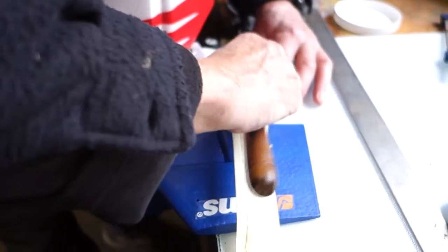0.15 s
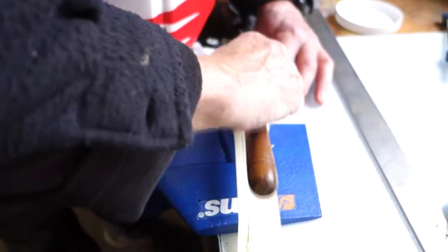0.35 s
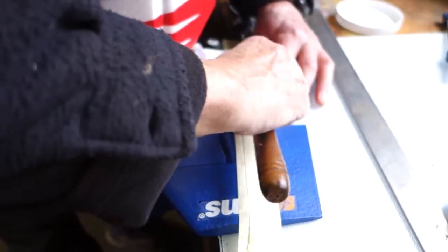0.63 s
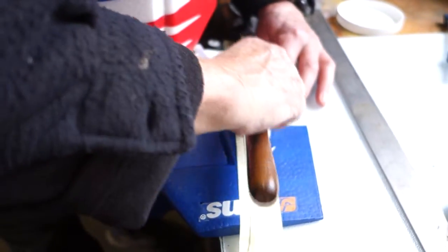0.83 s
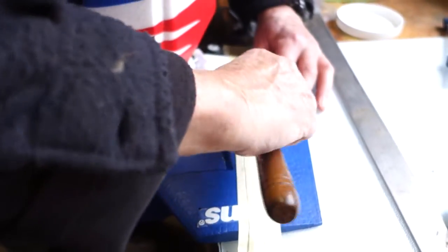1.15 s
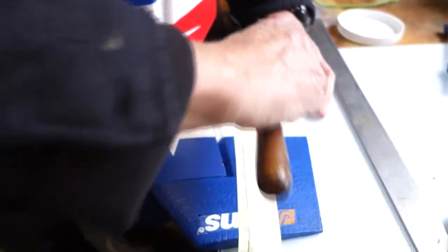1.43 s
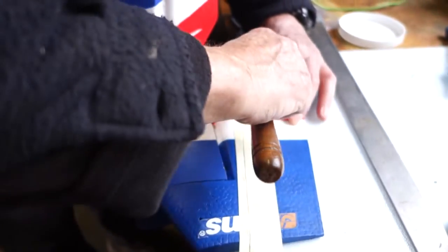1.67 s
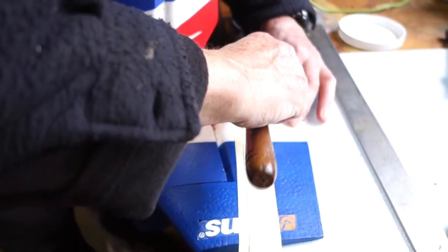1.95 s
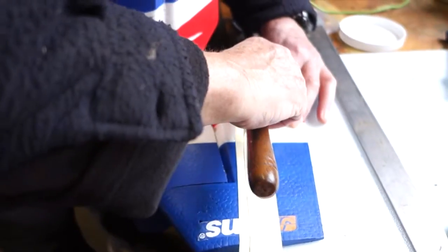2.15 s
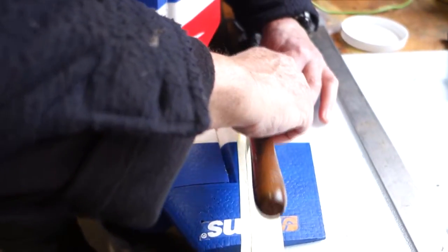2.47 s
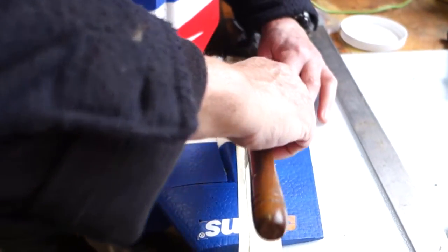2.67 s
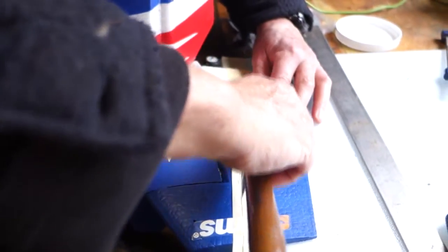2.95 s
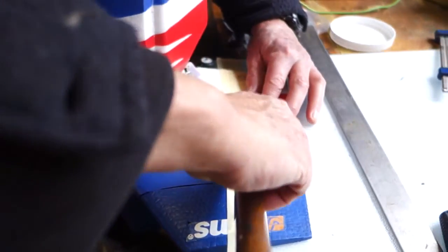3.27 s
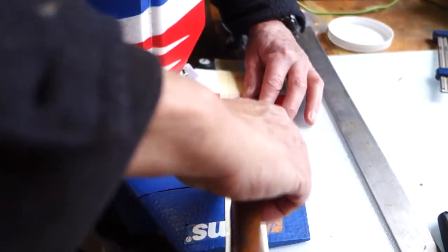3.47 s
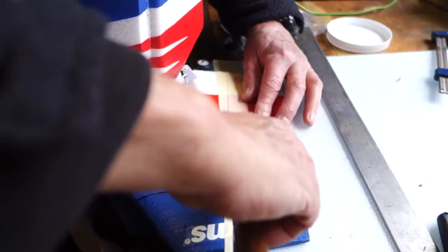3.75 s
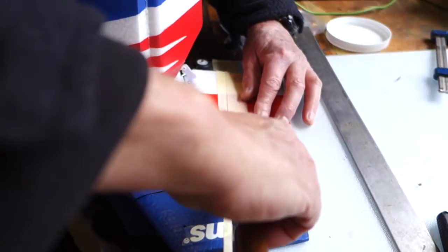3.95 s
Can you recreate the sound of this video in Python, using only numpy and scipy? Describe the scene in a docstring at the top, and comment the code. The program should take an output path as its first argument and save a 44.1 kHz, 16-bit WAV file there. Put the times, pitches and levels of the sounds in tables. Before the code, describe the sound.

A small fine-toothed razor saw cuts a groove in foam board, close to the microphone and slightly to the right, in a small workshop. From the start until about 1.5 seconds it makes quick, uneven back-and-forth strokes, each a dry, scratchy rasp, with small snaps as the teeth catch. The blade gives one brief high squeak at about 1.3 seconds. The sawing then thins to a few faint scrapes, ticks and tiny hollow creaks. At about 2.3 seconds a long rasping draw begins with a cluster of little cracks and fades around 3.3 seconds. Four more short strokes follow between 3.4 and 3.9 seconds. Hard pushes make the bench rumble softly near 0.5 and 1 second and again after 3 seconds. A motor, probably a fan, hums low throughout over soft room noise.

```python
"""A small workshop, stereo microphone close to a fine-toothed razor saw working a groove in foam board.
The teeth burst foam cells in a dry rasp that rings through board, blade and bench. They snag with small
snaps, the bench rumbles under hard pushes, the board creaks and the binding blade squeaks once.
Short strokes thin out, then come one long draw and a few more short ones.
Behind it a motor, probably a fan, hums low throughout over soft room noise."""
import sys
import numpy as np
from scipy import signal
from scipy.fft import rfft, irfft, next_fast_len
from scipy.io import wavfile
from scipy.ndimage import uniform_filter1d, map_coordinates

SR = 44100
rng = np.random.default_rng(int(sys.argv[2]) if len(sys.argv) > 2 else 0)


def generate_wav(signal):
    """Clip the signal to [-1, 1] and save it as 16-bit WAV at the path in sys.argv[1]."""
    frames = np.transpose(np.atleast_2d(signal))
    scaled = np.clip(frames, -1, 1) * 32767
    pcm = np.round(scaled).astype(np.int16)
    wavfile.write(sys.argv[1], SR, pcm)


N = 181017

# Levels in the tables are relative; spectra give level per unit of bandwidth.
# drift of the five-bladed fan: t/s, blade rate/Hz, level/dB
FAN_DRIFT = [(0.0, 96.3, -54), (.5, 95.5, -50.5), (1.28, 96, -46), (1.37, 93.5, -48), (1.75, 94.43, -48.5),
             (1.93, 92.9, -43), (2.72, 93.56, -45), (3.52, 94.1, -45), (4.1, 95.4, -49)]
# lines of the hum: multiple of the shaft rate, level/dB
FAN_ORDERS = [(2, -32), (4, -18), (5, 0.5), (6, -8), (7, -18.5), (8, -17), (10, -24), (11, -25.5),
              (12, -27), (14, -24)]
# the fan's ninth order swells and fades: t/s, level/dB
FAN_NINTH = [(0.0, -47), (1.55, -53.5), (2.5, -52), (3.7, -51), (4.1, -65)]
# spectrum of the still room: f/Hz, level/dB
AIR_SPECTRUM = [(25, -23.5), (64, -6.5), (96, -8.5), (135, -10.5), (175, -10), (260, -15.5), (330, -19.5),
                (450, -24.5), (700, -37.5), (1900, -31), (2700, -38), (3100, -42), (10000, -46.5),
                (15500, -59)]
# short strokes: top speed t/s, rise/s, fall/s, rasp/dB, then re the rasp: board/dB, fizz/dB, bench/dB
SHORT_STROKES = [ (0.0, .02, 0.078, -33.5, -2.5, -13, -9.5), (0.15, 0.097, 0.12, -31, -5, -6, -18.5),
                 (0.259, 0.042, 0.11, -39, -5.5, -4, -12.5), (0.417, 0.043, 0.08, -60, -11, -1, -12),
                 (0.524, 0.06, 0.064, -28.5, -3.5, -4.5, -13), (0.605, 0.032, .04, -39, -7, -5, -13),
                 (0.7, 0.096, 0.055, -33.5, -1.5, -1.5, -11.5),
                 (0.835, 0.034, 0.046, -44.5, 3.5, 3.5, -4.5), (1.041, 0.15, .14, -31, 2, -0.5, -9),
                 (1.231, 0.074, 0.092, -39.5, -5, -2.5, -11), (1.355, 0.1, 0.076, -33, -5, -4, -18),
                 (1.44, .04, 0.36, -60, 1, -10, 5), (1.878, 0.0072, 0.024, -62.5, 2, -1, -18),
                 (2.013, .013, 0.02, -54, -2, -2, -20), (2.105, 0.046, 0.048, -63, 2, -3, -20),
                 (2.228, 0.042, 0.066, -50.5, 2, 5.5, -15), (2.3, 0.014, 0.016, -50.5, 1.5, 10.5, -2),
                 (3.396, 0.04, 0.062, -35, -7, -12, -8), (3.506, 0.048, 0.078, -39, -9.5, -8, -13),
                 (3.618, 0.078, 0.12, -33.5, -2, -11.5, -8.5), (3.841, 0.069, 0.1, -36, -3, -9, -9.5)]
# long draw ending in a light drag: t/s, rasp/dB, then re the rasp: board/dB, fizz/dB, bench/dB
LONG_DRAW = [(2.31, -54.5, -6, 0, -3), (2.345, -47.5, -5.5, 6, -6), (2.41, -40.5, -2, -3, -12),
             (2.49, -43.5, 1.5, 1.5, -19), (2.57, -35.5, -2.5, -0.5, -19), (2.65, -38.5, -1, -6, -12.5),
             (2.9, -39, -2, -3.5, -9), (3.17, -41, -2, -1.5, -6), (3.29, -51, 2.5, -3.5, -13),
             (3.8, -48, -2, -8.5, 3.5), (4.1, -70.5, 3, 0, 1.5)]
# spectra of tearing foam, its body and its fizz: f/Hz, level/dB
RASP_SPECTRUM = [(200, -39), (600, -37), (1000, -8.5), (1500, -2.5), (2400, 1), (3300, 2), (4400, 1),
                 (5500, 1.5), (6900, 1), (8000, -12.5), (11000, -7.5), (16000, -10)]
FIZZ_SPECTRUM = [(2000, -30), (4500, -21.5), (6900, -0.5), (7800, 2.5), (9800, 2.5), (12000, -3),
                 (14000, -8.5), (16000, -24)]
# resonances of foam board, blade and bench: f/Hz, width/Hz, level/dB
BOARD_MODES = [(779, 63, 5), (885, 163, 5.5), (1167, 190, -1), (1270, 80, 8.5), (1413, 590, -2.5),
               (1706, 130, 9.5), (2277, 390, -1), (2770, 135, 6.5), (3080, 56, -1.5), (3420, 30, -44)]
BLADE_MODES = [(3950, 1130, -3), (4158, 150, 17), (4210, 560, 8.5), (5050, 64, 12), (5350, 420, -8),
               (6070, 44, 7)]
BENCH_MODES = [(58.6, 15, -10.5), (122, 49, -4), (244, 18.7, -4), (280.8, 15.6, 1.5), (372, 25, -4.5),
               (403, 69, -8.5), (531, 70, -14.5), (621, 31, -17.5), (965, 100, -6)]
# the blade rings most when deep in the groove: t/s, level/dB re the rasp
BLADE_RINGING = [(0, -3), (.35, -19), (1.1, -6), (1.45, -24), (2.9, -13), (3.15, -1.5), (4.1, -7)]
# teeth that snag and let go: t/s, crack/dB, tap/dB re the crack
TOOTH_SNAGS = [(0.001, -10, -8), (0.6015, -23, -23), (0.607, -18.5, -21), (0.8122, -27, -16),
               (0.917, -32, -16), (1.2127, -18, -30), (1.228, -22, -12.5), (1.3058, -25, -22),
               (1.39, -21, -25), (1.871, -47, -8), (2.1425, -41, -15), (2.2066, -35, -22),
               (2.3279, -26, -31), (2.414, -21, -30), (2.4211, -16, -30), (2.4245, -18, -32),
               (2.429, -22, -24), (2.4448, -15.5, -24), (2.6691, -31, 1), (2.777, -35, 3),
               (2.9963, -21, -16), (3.3975, -23, -9), (3.562, -26, -13), (3.7897, -33, -9),
               (3.8402, -28, -9)]
# the hand's pushes jolt the bench: peak t/s, level/dB, half-length/s
BENCH_JOLTS = [(0.557, -44, 0.042), (1.047, -43.5, 0.03), (2.585, -53.5, 0.0047), (2.81, -61, 0.023),
               (3.216, -41.5, 0.032), (3.442, -46.5, 0.056), (3.7, -44.5, 0.043), (3.887, -42.5, 0.029)]
# short hollow creaks of the board: peak t/s, f/Hz, level/dB, half-length/s
BOARD_CREAKS = [(1.24, 910, -48, 0.014), (1.885, 1290, -60, 0.0096), (2.016, 1269, -52, 0.0085),
                (2.897, 800, -53.5, 0.033)]
# stereo image of the saw at the microphone: f/Hz, left-right likeness (1 is mono)
SAW_LIKENESS = [(250, 0.98), (600, 0.87), (1300, 0.87), (2200, 0.58), (4000, 0.55), (8000, 0.29),
                (15000, 0.17)]
# balance of the work at the microphone: f/Hz, left minus right/dB
WORK_BALANCE = [(500, -0.5), (1200, 0), (2000, 0), (3300, -6), (5500, -2.5), (9000, -4.5), (12000, -1),
                (15000, -0.5)]
# reverberation of the workshop: f/Hz, T60/s
WALL_DECAY = [(200, 1), (2000, 0.85), (6000, 0.36), (14000, 0.37)]


def amp(db):
    """Decibels to gain."""
    return 10 ** (np.asarray(db) / 20)


def unit(x):
    """Scaled to rms 1."""
    return x / np.sqrt(np.mean(x ** 2) + 1e-20)


def along(points, hz):
    """Interpolates (f/Hz, value) points on a log axis."""
    f, values = np.transpose(points)
    return np.interp(np.log(hz + 1), np.log(f + 1), values)


def curves(rows):
    """One value per sample for each column after the time."""
    times, *columns = np.transpose(rows)
    return [np.interp(np.arange(N) / SR, times, column) for column in columns]


def wobble(rate):
    """A smooth random curve, rate knots a second."""
    knots = rng.standard_normal(int(N * rate / SR) + 4)
    return map_coordinates(knots, [np.arange(N) * rate / SR])


def swell(peak_s, half_s):
    """A bell-shaped rise and fall."""
    return np.exp(-((np.arange(N) / SR - peak_s) / half_s) ** 2)


def filtered(x, response):
    """x times a complex response of frequency."""
    size = next_fast_len(N + SR // 2)
    return irfft(rfft(x, size) * response(np.fft.rfftfreq(size, 1 / SR)), size)[..., :N]


def coloured(x, spectrum):
    """x shaped by a (f/Hz, level/dB) spectrum, at rms 1."""
    return unit(filtered(x, lambda hz: amp(along(spectrum, hz))))


def ringing(x, modes):
    """x through (f/Hz, width/Hz, level/dB) resonances of alternating sign, at rms 1."""
    def response(f):
        return sum((-1) ** k * amp(db) * 1j * f * width / (hz * hz - f * f + 1j * f * width)
                   for k, (hz, width, db) in enumerate(modes))
    return unit(filtered(x, response))


def spread(pair, likeness):
    """Two unrelated signals become left and right with the given (f/Hz, likeness)."""
    turn = lambda hz: np.arccos(np.clip(along(likeness, hz), -1, 1)) / 2
    mid, side = filtered(pair, lambda hz: np.array([np.cos(turn(hz)), np.sin(turn(hz))]))
    return np.array([mid + side, mid - side])


def fan(blades=5, mains_hz=51.5):
    """Orders of one drifting shaft beat against each other; the mains add a low line of steady pitch."""
    def line(phase):
        return np.sqrt(2) * np.sin(phase + 2 * np.pi * rng.random()) * amp(0.29 * wobble(4.64))
    blade_hz, hum_db = curves(FAN_DRIFT)
    ninth_db, = curves(FAN_NINTH)
    shaft = 2 * np.pi * np.cumsum(blade_hz / blades) / SR
    hum = amp(hum_db) * sum(amp(db) * line(order * shaft) for order, db in FAN_ORDERS)
    ninth = amp(ninth_db) * line(9 * shaft)
    mains = amp(-62) * line(2 * np.pi * mains_hz * np.arange(N) / SR)
    return hum + ninth + mains


def air():
    """Soft room noise, nearly mono in the bass."""
    noise = spread(rng.standard_normal((2, N)), [(150, 1.0), (500, 0.89), (2000, 0.2), (8000, 0.13)])
    return amp(-51) * coloured(noise, AIR_SPECTRUM)


def stroke(peak_s, rise_s, fall_s, bite_db=5.5):
    """The rasp follows the blade's swinging speed; the hand bears down most at top speed."""
    t = np.arange(N) / SR - peak_s
    swing = np.clip(1 - np.maximum(-t / rise_s, t / fall_s), 0, 1)
    speed = np.sin(np.pi / 2 * swing)
    return speed * amp(bite_db * (swing - 1))


def sawing_gains():
    """Gains of rasp, board, fizz and bench, summed in power over the long draw and the short strokes."""
    draw_db, *draw_colour = curves(LONG_DRAW)
    draw = amp(draw_db) * (np.arange(N) / SR > LONG_DRAW[0][0])
    power = np.array([draw, *(draw * amp(draw_colour))]) ** 2
    for peak_s, rise_s, fall_s, db, *colour in SHORT_STROKES:
        rasp = amp(db) * stroke(peak_s, rise_s, fall_s)
        power += np.outer(amp([0, *colour]), rasp) ** 2
    return np.sqrt(power)


def tearing(cells_per_s=7000, size_db=3, rub_db=-3, judder_db=0.99):
    """Foam cells burst at random under the teeth, over the smooth rub of the blade's flanks."""
    bursts = rng.random((2, N)) < cells_per_s / SR
    sizes = amp(size_db * np.minimum(rng.exponential(size=(2, N)), 4))
    cells = unit(bursts * sizes * rng.choice([-1, 1], (2, N)))
    rub = amp(rub_db) * rng.standard_normal((2, N))
    return unit((cells + rub) * amp(judder_db * wobble(260)))


def blade_shimmer(x, depth_db=2):
    """The close resonances of a thin blade slide as it moves: a fine random shifting of treble colour."""
    hz, _, spectra = signal.stft(x, SR, nperseg=1024)
    ripple = rng.standard_normal(spectra.shape[1:])
    ripple = uniform_filter1d(ripple, size=3, axis=0)  # across frequency
    ripple = unit(uniform_filter1d(ripple, size=7, axis=1))  # across time
    treble = np.minimum(hz / 5000, 1)[:, None]
    _, shifted = signal.istft(spectra * amp(depth_db * treble * ripple), nperseg=1024)
    return unit(shifted[:, :N])


def saw(dig_reference_db=-31.5):
    """The tearing reaches the microphone directly and through board, blade and bench."""
    rasp_gain, board_gain, fizz_gain, bench_gain = sawing_gains()
    blade_db, = curves(BLADE_RINGING)
    force = blade_shimmer(tearing())
    force *= amp(0.8 * wobble(70))  # uneven pressure
    driven = lambda modes, spectrum: ringing(coloured(force, spectrum), modes)
    rasp = rasp_gain * amp(-6) * coloured(force, RASP_SPECTRUM)
    fizz = fizz_gain * amp(-2) * coloured(force, FIZZ_SPECTRUM)
    board = driven(BOARD_MODES, [(300, -13), (640, -14), (850, -6), (1600, 0), (3000, 2.5), (7000, -10)])
    # on loud strokes the teeth dig in, and the board's low modes grow faster than the rasp
    dig = driven(BOARD_MODES, [(300, -8), (620, 24), (790, -7.5), (1250, 0.5), (1700, -12)])
    dig *= rasp_gain / amp(dig_reference_db)
    board = board_gain * (amp(-6) * board + amp(-16) * dig)
    blade = driven(BLADE_MODES, [(1000, -30), (3500, 0.5), (6500, 4), (12000, -8)])
    bench = driven(BENCH_MODES, [(330, 4.5), (500, -2), (1000, -10), (2000, -25)])
    return rasp + fizz + board + rasp_gain * amp(blade_db) * blade + bench_gain * bench


def snags(rise_s=0.0002, crack_t60_s=0.013, shiver_t60_s=0.08, shiver_db=-20):
    """A caught tooth breaks free: a bright crack, a brief shiver of the blade and a tap on the board."""
    t = np.arange(SR // 10) / SR
    decay = amp(-60 * t / crack_t60_s) + amp(shiver_db - 60 * t / shiver_t60_s)
    envelope = (1 - np.exp(-t / rise_s)) * decay
    crack_gain, tap_gain = np.zeros((2, N + SR))
    for start_s, db, tap_db in TOOTH_SNAGS:
        start = round(start_s * SR)
        crack_gain[start:start + len(t)] += amp(db) * envelope
        tap_gain[start:start + len(t)] += amp(db + tap_db) * envelope
    crack = coloured(rng.standard_normal((2, N)),
                     [(500, -23.5), (2000, -13.5), (4500, -1.5), (7000, -0.5), (11500, 0), (15000, -8)])
    tap = coloured(rng.standard_normal((2, N)), [(400, -22), (800, 0.5), (4000, 19.5), (8000, -10)])
    return amp(-5) * crack_gain[:N] * crack + amp(1) * tap_gain[:N] * ringing(tap, BOARD_MODES)


def jolts():
    """Each hard push makes the bench rumble for a moment."""
    push = sum(amp(db) * swell(peak_s, half_s) for peak_s, db, half_s in BENCH_JOLTS)
    shake = coloured(rng.standard_normal(N), [(450, 9), (1000, -1), (2000, -16)])
    return amp(-1) * push * ringing(shake, BENCH_MODES)


def creaks(pitch_waver=0.13, flutter_db=1):
    """The blade briefly drives one mode of the board, unsteadily."""
    uneven_time = np.cumsum(1 + pitch_waver * wobble(700)) / SR
    flutter = amp(flutter_db * wobble(330))
    tones = sum(amp(db) * swell(peak_s, half_s) * np.sin(2 * np.pi * hz * uneven_time)
                for peak_s, hz, db, half_s in BOARD_CREAKS)
    return np.sqrt(2) * flutter * tones


def squeak(start_s=1.305, length_s=0.092, rise_s=0.017, fall_s=0.0047,
           start_hz=6350, glide_hz_per_s=4800, swell_db_per_s=115):
    """Steel sticks and slips on foam: a rough whistle climbs and swells, and other blade modes zing."""
    t = np.clip(np.arange(N) / SR - start_s, 0, length_s)
    binding = np.minimum(np.minimum(t / rise_s, (length_s - t) / fall_s), 1)
    hz = (start_hz + glide_hz_per_s * t) * (1 + 0.028 * wobble(1100))
    whistle = np.sin(2 * np.pi * np.cumsum(hz) / SR)
    zing = ringing(rng.standard_normal((2, N)),
                   [(5610, 270, 4.5), (6300, 360, -5), (8460, 250, 0), (9700, 560, -7.5), (11600, 370, -16)])
    flutter_db = 4 * wobble(250)
    return binding * amp(-42.5 + swell_db_per_s * t + flutter_db) * (whistle + amp(-3) * zing)


def workshop(x):
    """The walls answer 5 ms late, each frequency dying at its own speed."""
    hz, t, spectra = signal.stft(rng.standard_normal((2, SR * 3 // 4)), SR, nperseg=256)
    decay = amp(-60 * t / along(WALL_DECAY, hz)[:, None])
    _, tail = signal.istft(spectra * decay, SR, nperseg=256)
    late = np.pad(x, ((0, 0), (SR // 200, 0)))
    return signal.fftconvolve(late, tail / np.linalg.norm(tail[0]), axes=1)[:, :N]


def scene():
    """The saw close up and a little to the right, with walls, fan and room noise behind it."""
    work = spread(saw() + snags(), SAW_LIKENESS) + squeak() + creaks() + jolts()
    near = filtered(work, lambda hz: amp(np.outer([0.5, -0.5], along(WORK_BALANCE, hz))))
    walls = spread(workshop(work), [(250, 0.97), (1000, 0.34), (3000, 0.025)])
    return near + amp(-14) * walls + fan() + air()


def record(dry):
    """The microphone chain passes nothing above 15.8 kHz."""
    return filtered(dry, lambda hz: hz < 15800)


dry = scene()
out = record(dry)
generate_wav(out)
```